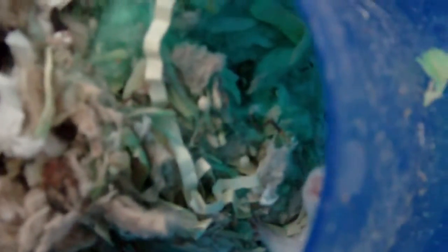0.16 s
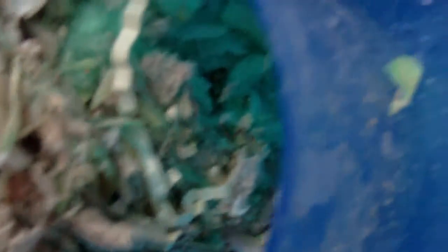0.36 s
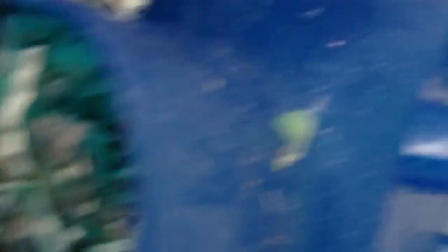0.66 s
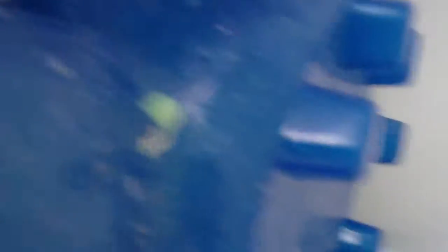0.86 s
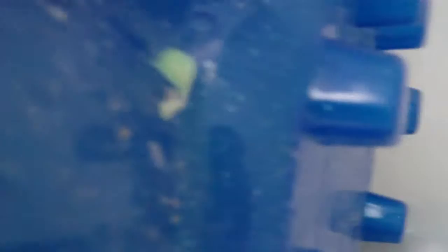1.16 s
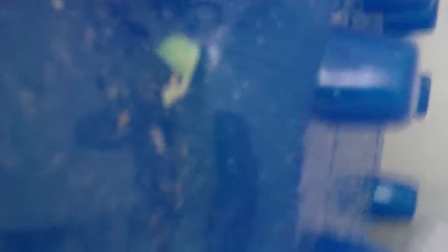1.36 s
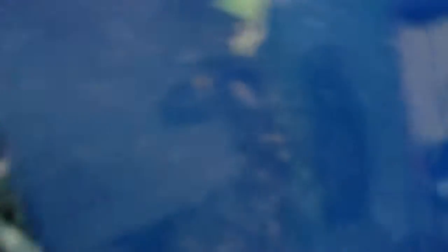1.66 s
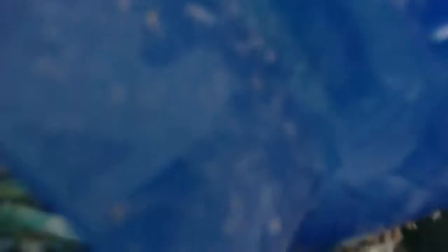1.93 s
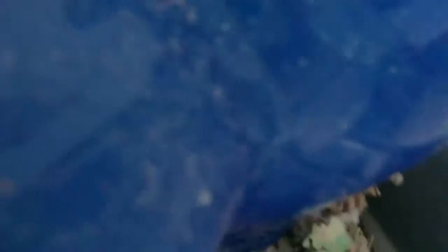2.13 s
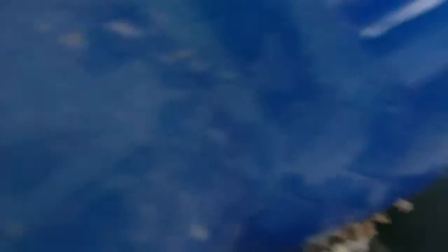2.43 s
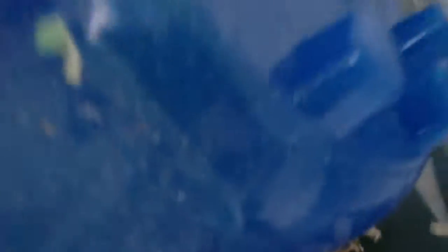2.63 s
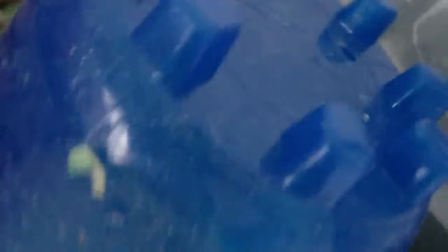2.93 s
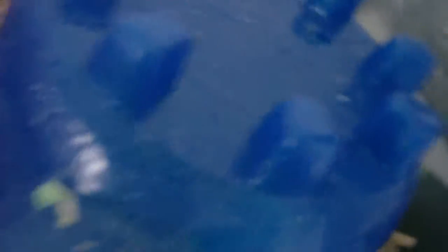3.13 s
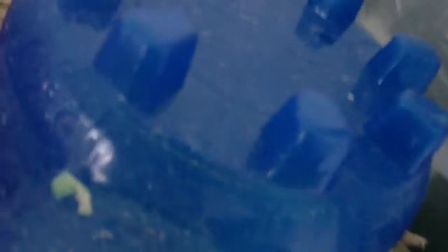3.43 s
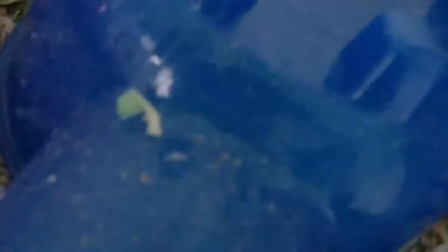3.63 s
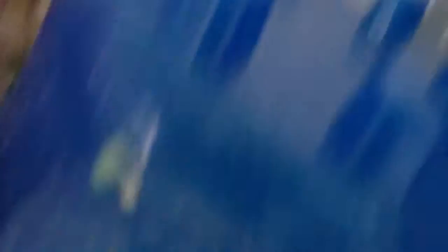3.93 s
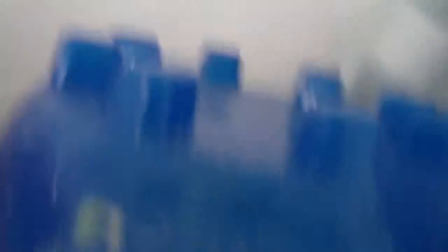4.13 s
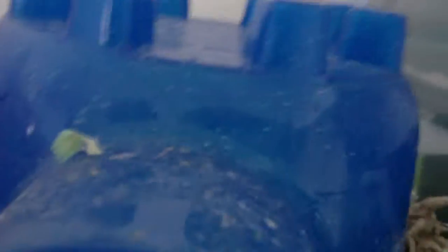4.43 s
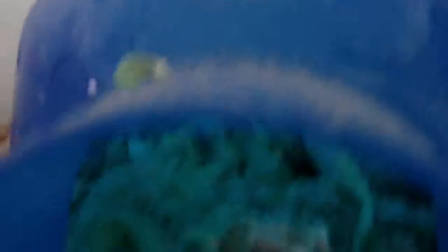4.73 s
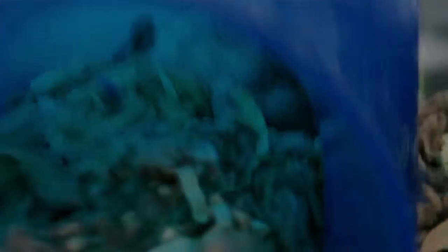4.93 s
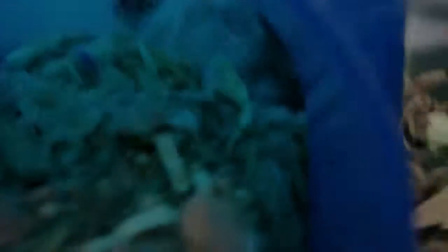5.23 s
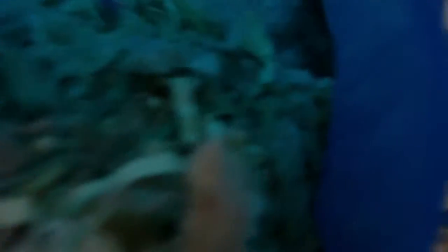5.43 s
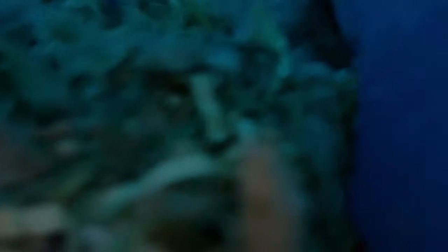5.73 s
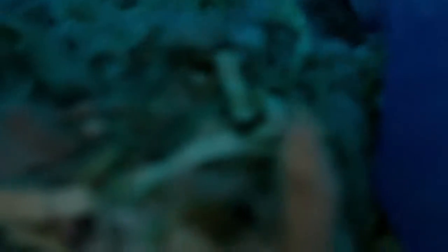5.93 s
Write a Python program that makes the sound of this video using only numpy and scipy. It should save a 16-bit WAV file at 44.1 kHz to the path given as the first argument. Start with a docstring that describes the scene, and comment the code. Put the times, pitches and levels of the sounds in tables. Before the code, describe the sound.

Very close handheld microphone in a small pet cage. Low unsteady rumble and thin hiss, with faint camera lens ticks. Small contacts click and rub a hollow plastic hut in scattered groups. At about 4.4, 5.0 and 5.5 seconds three hard knocks crack and distort, the last deader. Shredded paper then rustles softly, ending with a tiny squeak.

```python
"""Plastic hamster hut in shredded paper bedding, heard close: contacts tick and rub its shell, which rings in modes.
Three sharp knocks right at the microphone overload it: crack, smack, shell ring and thud, clipped.
After the last, the bedding rustles as swells of tiny paper snaps, with one tiny gliding squeak.
Underneath: noise rumble and hiss, a faint hum of sines, ticks of a hand-held camera's focusing lens and
the dull drag of skin on its case."""
import sys
import numpy as np
from scipy import signal
from scipy.fft import rfft, irfft, next_fast_len
from scipy.io import wavfile
from scipy.ndimage import map_coordinates

SR = 44100
rng = np.random.default_rng(int(sys.argv[2]) if len(sys.argv) > 2 else 0)


def pcm_store(signal):
    """Save signal as 16-bit PCM."""
    levels = np.round(np.clip(np.atleast_2d(signal), -1, 1) * 32767)
    wavfile.write(sys.argv[1], SR, levels.astype(np.int16).T)


N = 268128
TIME_S = np.arange(N) / SR

# Rubbing strokes on the plastic: start_s, end_s, level_db (before a shared trim), brightness_db
STROKES = [(1.467, 1.595, -56, -12.5), (1.578, 1.685, -46.5, -4.5), (1.711, 1.832, -54, -1.5),
           (1.818, 1.911, -43, -2.5), (1.914, 2.012, -54, -0.5), (2.734, 2.779, -49, 3.5),
           (2.788, 2.956, -49.5, 8), (2.916, 2.962, -51.5, -10.5), (3.065, 3.09, -46, 0),
           (3.125, 3.166, -45, -1.5), (3.151, 3.198, -45, -6.5), (3.605, 3.659, -48.5, 2.5),
           (3.731, 3.88, -52, 0.5), (3.844, 3.93, -36, 1), (3.913, 4.173, -45, -1.5),
           (4.073, 4.21, -40.5, 3.5), (4.245, 4.306, -57.5, 1), (4.665, 4.776, -55.5, -3),
           (4.765, 4.832, -49.5, -1.5), (5.48, 5.507, -36, -7)]
# Small contacts with the shell: start_s, level_db, hardness (0 soft pad to 1 thin hard edge)
CLICKS = [(1.167, -52.5, 0.3), (1.261, -46.5, 0.1), (1.429, -46, 0), (1.479, -46.5, 0.78),
          (1.492, -37, 0.65), (1.515, -40, .55), (1.521, -30.5, 0.53), (1.609, -31.5, 0.67),
          (1.984, -36, 0.17), (2.845, -56, 0.12), (3.007, -54, 0.3), (3.068, -39.5, 0), (3.135, -40, .05),
          (3.622, -43.5, .9), (3.773, -36.5, 0.42), (3.807, -43, 0.5), (3.814, -49, .4), (3.86, -36.5, 1),
          (3.945, -43.5, 0.77), (3.981, -36.5, 0), (4.515, -41, 0.38), (4.581, -45.5, 0.76),
          (4.618, -55, 0.7), (4.708, -46.5, 0.5), (4.935, -27, 0.62), (5.021, -32, 1), (5.029, -40, 0.66),
          (5.043, -38.5, .75), (5.062, -32, 0.96), (5.202, -53.5, 0.3), (5.501, -34.5, 1), (5.489, -44, .6),
          (5.83, -42.5, 0.4), (5.893, -51, 0.5)]
# Knocks: start_s, impact_db, weight_db, favoured_hz, deadness (0 rebounds to 1 stays pressed on)
KNOCKS = [(0.51, -29.5, -31.5, 490, 1), (4.4231, -5, -8, 1295, 0.09), (4.515, -36, -22.5, 490, 0.02),
          (4.9994, 0, -5.5, 1855, 0.12), (5.46, 4, -2, 677, 0.8)]
# Shoves through the bedding: start_s, end_s, level_db
RUSTLES = [(0, 1.1, -69), (5.459, 5.474, -28.5), (5.465, 5.515, -36.5), (5.48, 5.625, -47),
           (5.675, 5.925, -42.5), (5.915, 6.06, -47.5)]
# Spells in which single shreds settle: start_s, end_s, level_db
SETTLING = [(0, 1.1, -66), (4.55, 5.0, -69.5), (5.19, 5.29, -60), (5.35, 5.7, -65)]
# Runs of the focusing lens: start_s, end_s, level_db (before a shared trim)
FOCUS_RUNS = [(0.082, .1, -57), (0.201, .25, -55), (0.656, .675, -59), (0.845, 1.03, -58),
              (2.01, 2.09, -56), (2.214, 2.37, -57), (4.349, 4.4, -63), (5.372, 5.41, -59)]
# Hand shifts on the camera: start_s, end_s, level_db
HANDLING = [(.1, .5, -59), (1.5, 2.1, -58), (2.04, 2.2, -54.5), (4, 6.08, -61)]

# Modes of the plastic shell: pitch_hz, level_db, t60_s (before length scaling)
SHELL_MODES = [(476, -3, 0.021), (598, 4, 0.013), (866, -8.5, 0.031), (1136, -3, 0.053), (1206, -3, 0.028),
               (1367, -6, 0.025), (1637, -7, 0.035), (1730, -8.5, 0.039), (1788, -3, 0.015),
               (1920, -9, 0.036), (2344, -3, 0.024), (2633, -1, 0.021), (2980, -8, 0.012),
               (3170, -5.5, 0.031), (3900, -41, 0.011), (5210, -7.5, 0.016), (5500, -7, 0.015)]
# Slow modes shaken by a heavy blow: pitch_hz, level_db, t60_share (of THUD_T60_S)
THUD_MODES = [(89.5, 6.5, 0.84), (152, -10, 1), (191, -3.5, 0.92), (350, -16, 0.7)]
# Hum partials: pitch_hz, level_db
HUM_PARTIALS = [(242, -61), (545, -69), (1195, -76), (1365, -78)]

# Relative spectra: frequency_hz, density_db (per Hz)
# dry contact rubbing on plastic
SCUFF_SPECTRUM = [(700, -17), (930, -31), (1150, -20.5), (1450, -24.5), (2200, 4), (3500, 0), (4400, -8.5),
                  (5700, -5.5), (7000, -6.5), (8500, -3.5), (10500, -7.5), (12500, -11.5), (15500, -20.5)]
# paper shreds sliding
PAPER_SPECTRUM = [(260, -44), (450, -14.5), (712, -8.5), (958, -16), (1050, -6.5), (1290, -5), (1890, -20),
                  (2700, -8), (4270, -20), (6010, -19), (9090, -21), (11000, -31), (15500, -31)]
# hard edge of a light contact; also settling shreds and lens ticks
SNAP_SPECTRUM = [(500, -31), (900, 6.5), (1200, -5), (1700, -2.5), (3100, 0), (4000, -1.5), (4600, -13.5),
                 (5600, -3.5), (8300, -11), (10000, -15.5), (15000, -32)]
# dull smack of a blow; also skin on the camera case
SMACK_SPECTRUM = [(50, -35), (160, -5.5), (300, 4.5), (480, -0.5), (700, -8), (1200, -11), (4000, -36.5)]
# crack of a hard knock
CRACK_SPECTRUM = [(400, -20), (1000, 4), (1900, 6), (3000, 1), (4500, -13.5), (8500, -16), (11000, -22),
                  (15000, -35)]
# background rumble
RUMBLE_SPECTRUM = [(15, -6), (35, -7.5), (55, 4), (67, -2.5), (80, 2), (115, -8.5), (160, -11.5),
                   (205, -16.5), (245, -14.5), (295, -25), (450, -27.5), (620, -39), (800, -74),
                   (1300, -68.5)]
# background hiss
HISS_SPECTRUM = [(380, -2), (650, 0.5), (804, -3), (930, -2.5), (1020, -4), (1350, -0.5), (1960, -6),
                 (2450, -2.5), (3200, -3), (4700, -12.5), (6540, -9.5), (14300, -19.5), (15500, -22.5)]

# Rumble level over time: time_s, level_db (before a shared trim)
RUMBLE_LEVEL = [(0.0, -39), (0.22, -38), (1.29, -45), (1.86, -39), (3.06, -43), (4.94, -42.5), (5.55, -38),
                (6.08, -42.5)]
# Hiss level over time: time_s, level_db
HISS_LEVEL = [(0, -60), (1.2, -64), (2.1, -61.5), (4.4, -62), (5.2, -66.5), (6.08, -62)]
# Lower edges of the low, middle and treble parts: edge_hz
BAND_EDGES_HZ = [930, 1900, 4500]
TOP_HZ = 15500

# Click: middle and treble against low; middle gained at full hardness
CLICK_MID_DB, CLICK_TREBLE_DB, HARD_MID_DB = -9, -12.5, 11
# Treble lost by the softest contact; low part lost by the hardest, too brief to move low modes
SOFT_LOSS_DB, THIN_LOSS_DB = 9.5, 22

# Knock: crack and push against impact; smack and thud against weight
CRACK_DB, PUSH_DB, SMACK_DB, THUD_DB = -4, -13.5, -10.5, -1.5
# Free knock: spread of favoured modes, ring length factor, thud decay
SPREAD_OCT, RING_LENGTH, THUD_T60_S = 0.45, 0.87, 0.2
# Fully dead knock: added damping (fraction), thud change, push change
DEAD_DAMPING, DEAD_THUD_DB, DEAD_PUSH_DB = 0.53, -28.5, 16.5

# Stroke: low and treble against middle at zero brightness; low dB lost per dB of brightness
RUB_LOW_DB, RUB_TREBLE_DB, RUB_THINNING = -3, -7, 0.6

LENS_STEP_S = 1 / 30
SHRED_T60_S = 0.016
HUM_WAVER_DB = 1.3
CLUMP_DB = 1.5  # unevenness of the bedding


def amp(db):
    """Decibels to gain."""
    return 10 ** (np.asarray(db) / 20)


def unit(x):
    """Scale to rms 1."""
    return x / np.sqrt(np.mean(x ** 2) + 1e-20)


def curve(rows, axis=1):
    """One column of a time table, interpolated per sample."""
    rows = np.asarray(rows)
    return np.interp(TIME_S, rows[:, 0], rows[:, axis])


def wobble(rate_hz):
    """Smooth random curve, rate_hz knots a second."""
    knots = rng.standard_normal(int(N * rate_hz / SR) + 4)
    return map_coordinates(knots, [TIME_S * rate_hz])


def colour(x, spectrum):
    """Filter x by a spectrum table; rms 1."""
    f_hz, db = np.transpose(spectrum)
    size = next_fast_len(len(x) + 8192)
    hz = np.fft.rfftfreq(size, 1 / SR)
    gain = amp(np.interp(np.log(hz + 1), np.log(f_hz), db))
    return unit(irfft(rfft(x, size) * gain, size)[:len(x)])


def bands(x):
    """Low, middle and treble parts of x, overlapping smoothly, bass left out."""
    size = next_fast_len(len(x) + 2048)
    hz = np.fft.rfftfreq(size, 1 / SR)
    low, middle, treble = (1 - 1 / (1 + (hz / edge_hz) ** 8) for edge_hz in BAND_EDGES_HZ)
    gains = np.array([low - middle, middle - treble, treble])
    return irfft(rfft(x, size) * gains, size)[:, :len(x)]


def add(out, start_s, x):
    """Mix x into out at start_s."""
    part = out[max(round(start_s * SR), 0):][:len(x)]
    part += x[:len(part)]


def slips(size, rate_hz, scatter_db):
    """Tiny random impulses of uneven size, on average rate_hz a second."""
    fires = rng.random(size) < rate_hz / SR
    signs = rng.choice([-1, 1], size)
    return fires * signs * amp(scatter_db * rng.standard_normal(size))


def burst(t, spectrum, t60_s):
    """Coloured noise with exponential decay."""
    return colour(rng.standard_normal(len(t)), spectrum) * amp(-60 * t / t60_s)


def swell(size, shape=0.7):
    """One movement gathers speed and comes to rest."""
    return np.abs(np.sin(np.linspace(0, np.pi, size))) ** shape


def movements(rows, shape):
    """Summed swells of start_s, end_s, level_db rows, as gain per sample."""
    out = np.zeros(N)
    for start_s, end_s, db in rows:
        size = max(round((end_s - start_s) * SR), 2)
        add(out, start_s, amp(db) * swell(size, shape))
    return out


def shell_ring(t, weights, length, scatter_db, detune):
    """Weighted shell modes ring down together; random size and pitch make each contact differ."""
    hz, db, t60_s = np.transpose(SHELL_MODES)[:, :, None]
    size, shift = rng.standard_normal((2, len(SHELL_MODES), 1))
    decay = amp(db + scatter_db * size - 60 * t / (t60_s * length))
    return weights @ (decay * np.sin(2 * np.pi * hz * (1 + detune * shift) * t))


def background():
    """Unsteady noise rumble, thin noise hiss and a hum of sines wavering in level and phase."""
    rumble_gain = amp(curve(RUMBLE_LEVEL) + 2.5 + 0.85 * wobble(5.05))
    rumble = rumble_gain * colour(rng.standard_normal(N), RUMBLE_SPECTRUM)
    hiss_gain = amp(curve(HISS_LEVEL) + 0.34 * wobble(15))
    hiss = hiss_gain * colour(rng.standard_normal(N), HISS_SPECTRUM)
    hum = np.zeros(N)
    for hz, db in HUM_PARTIALS:
        gain = amp(db + HUM_WAVER_DB * wobble(2.8))
        hum += gain * unit(np.sin(2 * np.pi * hz * TIME_S + 0.42 * wobble(4.62)))
    return rumble + hiss + hum


def bedding():
    """Paper shreds slide over each other in clumps of tiny snaps; single shreds settle with short ticks."""
    snaps = colour(slips(N, rate_hz=3500, scatter_db=5), PAPER_SPECTRUM)
    rustle = movements(RUSTLES, shape=0.71) * amp(CLUMP_DB * wobble(90)) * snaps
    t = np.arange(SR // 40) / SR
    tick = rng.standard_normal(len(t)) * amp(-60 * t / SHRED_T60_S)
    ticks = signal.fftconvolve(slips(N, rate_hz=60, scatter_db=4), tick)[:N]
    return rustle + movements(SETTLING, shape=0.25) * colour(ticks, SNAP_SPECTRUM)


def lens():
    """The lens moves in evenly spaced steps, each a faint soft tick with one narrow ring."""
    out, t = np.zeros(N), np.arange(SR // 20) / SR
    attack = 1 - np.exp(-t / 0.00079)
    for start_s, end_s, db in FOCUS_RUNS:
        for step_s in np.arange(start_s, end_s, LENS_STEP_S):
            ring_hz = 2350 * (1 + 0.006 * rng.standard_normal())
            ring = np.sin(2 * np.pi * ring_hz * t) * amp(-60 * t / 0.052)
            tick = (ring + amp(-1.5) * burst(t, SNAP_SPECTRUM, t60_s=0.034)) * attack
            add(out, step_s, amp(db + 5.5 + 2 * rng.standard_normal()) * tick)
    return out


def handling():
    """Skin drags on the camera's case: dull noise in uneven swells."""
    drag = colour(rng.standard_normal(N), SMACK_SPECTRUM)
    return movements(HANDLING, shape=0.64) * amp(1.5 * wobble(30)) * drag


def knocks():
    """Crack and smack, shell modes favoured by the point of impact, deep thud and one slow push."""
    out, t = np.zeros(N), np.arange(SR // 3) / SR
    u = t / 0.0012  # time in push lengths
    attack = 1 - np.exp(-t / 0.00032)
    mode_hz = np.array(SHELL_MODES)[:, 0]
    for start_s, impact_db, weight_db, favoured_hz, deadness in KNOCKS:
        dead = np.clip(deadness, 0, 1)
        damping = 1 + DEAD_DAMPING * dead
        distance_oct = np.log2(mode_hz / favoured_hz)
        favour = 1 / (1 + (distance_oct / (SPREAD_OCT * damping)) ** 2)
        ring = amp(-4) * shell_ring(t, favour, RING_LENGTH / damping, scatter_db=0.5, detune=0.003)
        crack = amp(CRACK_DB) * burst(t, CRACK_SPECTRUM, t60_s=0.01)
        push = amp(PUSH_DB + DEAD_PUSH_DB * dead) * (1 - u) * np.exp(-u)
        smack = amp(SMACK_DB) * burst(t, SMACK_SPECTRUM, t60_s=0.046)
        sway = np.zeros(len(t))
        for hz, db, t60_share in THUD_MODES:
            decay = amp(db - 60 * t * damping / (THUD_T60_S * t60_share))
            sway += decay * np.sin(2 * np.pi * hz * t)
        thud = amp(THUD_DB + DEAD_THUD_DB * dead) * sway
        impact = amp(impact_db) * (ring + crack + push)
        weight = amp(weight_db) * (smack + thud)
        add(out, start_s, (impact + weight) * attack)
    return out


def clicks():
    """A brief gritty contact and the shell's short ring; hardness sets grit and band balance."""
    out, t = np.zeros(N), np.arange(SR // 10) / SR
    span = SR // 100  # band levels refer to the first 10 ms
    attack = 1 - np.exp(-t / 0.000085)
    # a light touch hardly moves the lowest modes
    reach = 1 / (1 + (1000 / np.array(SHELL_MODES)[:, 0]) ** 8)
    for start_s, db, hardness in CLICKS:
        hard = np.clip(hardness, 0, 1)
        low_db = -THIN_LOSS_DB * hard ** 6
        mid_db = CLICK_MID_DB + HARD_MID_DB * hard
        treble_db = CLICK_TREBLE_DB - SOFT_LOSS_DB * (1 - hard) ** 2
        weights = reach * rng.choice([-1, 1], len(SHELL_MODES))
        ring = shell_ring(t, weights, length=1, scatter_db=1.5, detune=0.008)
        grit = amp(2 + 9 * hard) * burst(t, SNAP_SPECTRUM, t60_s=0.015)
        parts = bands((ring + grit) * attack)
        parts /= np.sqrt(np.mean(parts[:, :span] ** 2, axis=1, keepdims=True))
        add(out, start_s, amp(db) * amp([low_db, mid_db, treble_db]) @ parts)
    return out


def rubbing():
    """Each stroke is a swell of dense micro-slips that hiss directly and keep the shell ringing."""
    out, t = np.zeros(N), np.arange(SR // 20) / SR
    for start_s, end_s, db, bright_db in STROKES:
        size = max(round((end_s - start_s) * SR), 512)
        grip = slips(size, rate_hz=4000, scatter_db=5)
        # each stroke touches a new spot with its own colour
        spot = rng.standard_normal(len(t)) * amp(-60 * t / 0.0075)
        spot *= 0.6 / np.linalg.norm(spot)
        spot[0] = 1
        hiss = colour(signal.fftconvolve(grip, spot)[:size], SCUFF_SPECTRUM)
        signs = rng.choice([-1, 1], len(SHELL_MODES))
        response = shell_ring(t, signs, length=0.4, scatter_db=2, detune=0.015)
        ring = unit(signal.fftconvolve(grip, response)[:size])
        parts = np.array([unit(part) for part in bands(hiss + ring / 2)])
        balance_db = [RUB_LOW_DB - RUB_THINNING * bright_db, 0, RUB_TREBLE_DB + bright_db]
        add(out, start_s, amp(db) * (amp(balance_db) @ parts) * swell(size))
    return amp(-3.0 + 1.3 * wobble(110)) * out


def squeak(start_s=5.947, length_s=0.015, low_hz=2370, bend=0.145, level_db=-47):
    """A sticking slip squeaks: four harmonics whose pitch sags and recovers."""
    out, u = np.zeros(N), np.linspace(-1, 1, round(length_s * SR))
    phase = 2 * np.pi * np.cumsum(low_hz * (1 + bend * u ** 2)) / SR
    harmonics_db = [-2, -1.5, -9, -13]
    tone = sum(amp(db) * np.sin(k * phase) for k, db in enumerate(harmonics_db, start=1))
    add(out, start_s, amp(level_db) * unit(tone * (1 - u ** 2)))
    return out


def cage(x, t60_s=0.13, wet_db=-21):
    """Weak, short answer from the cage walls: x convolved with decaying noise."""
    t = np.arange(SR // 4) / SR
    tail = rng.standard_normal(len(t)) * amp(-60 * t / t60_s)
    return x + amp(wet_db) * signal.fftconvolve(x, tail / np.linalg.norm(tail))[:N]


def scene():
    """Contacts in the cage, over the camera's own noises and the background."""
    contacts = bedding() + knocks() + clicks() + rubbing() + squeak()
    camera = lens() + handling()
    return (cage(contacts) + camera + background())[None]


def record(dry):
    """Overload clips at full scale; nothing passes at or above TOP_HZ."""
    size = next_fast_len(N + 8192)
    hz = np.fft.rfftfreq(size, 1 / SR)
    clipped = np.clip(dry, -1, 1)
    return irfft(rfft(clipped, size) * (hz < TOP_HZ), size)[:, :N]


dry = scene()
out = record(dry)
pcm_store(out)
```